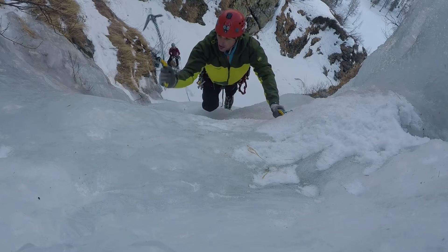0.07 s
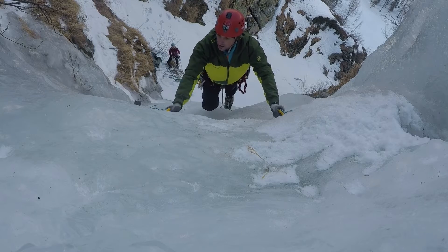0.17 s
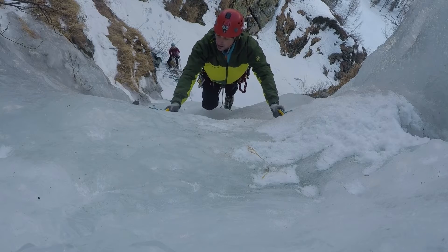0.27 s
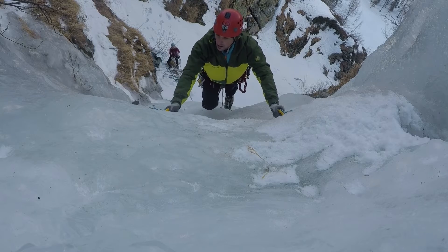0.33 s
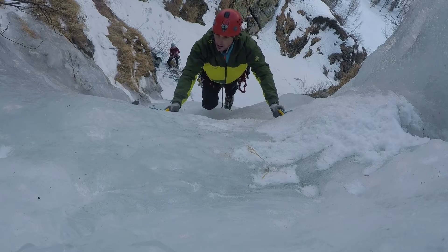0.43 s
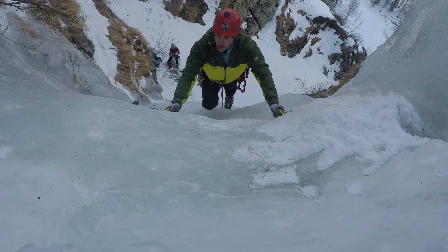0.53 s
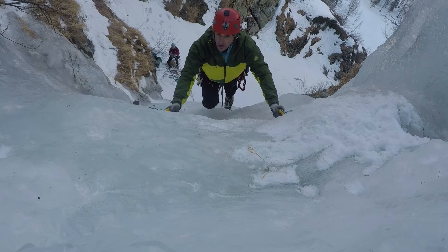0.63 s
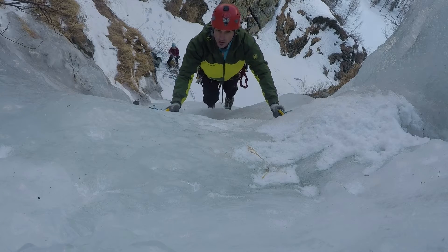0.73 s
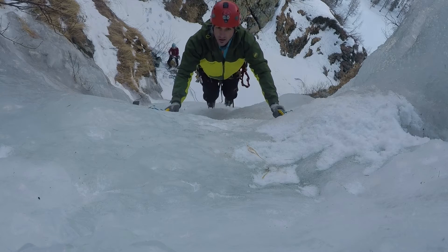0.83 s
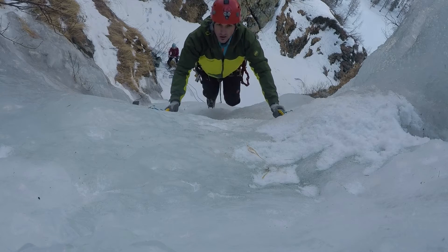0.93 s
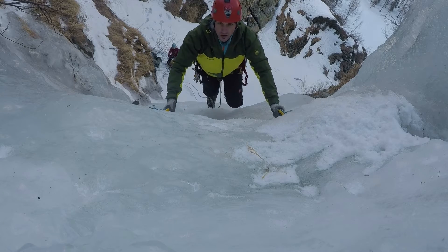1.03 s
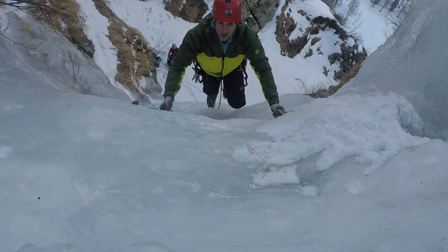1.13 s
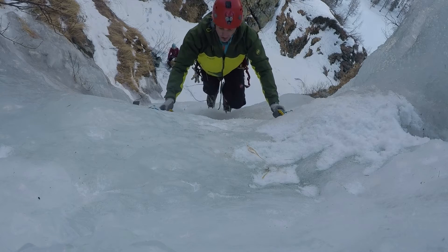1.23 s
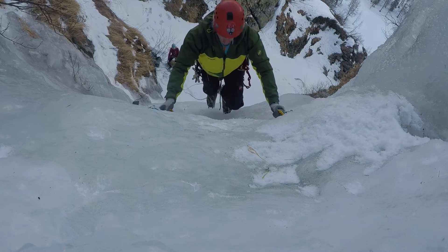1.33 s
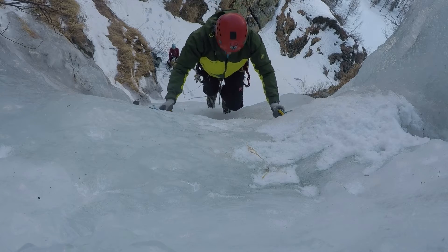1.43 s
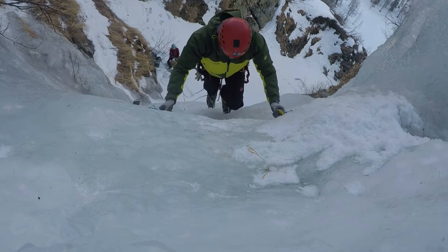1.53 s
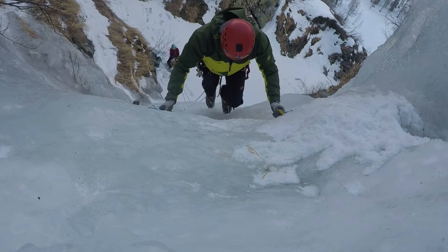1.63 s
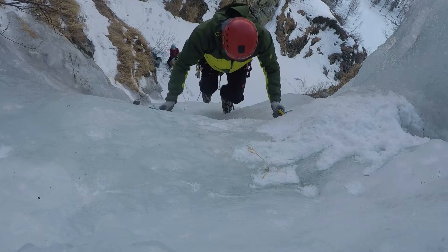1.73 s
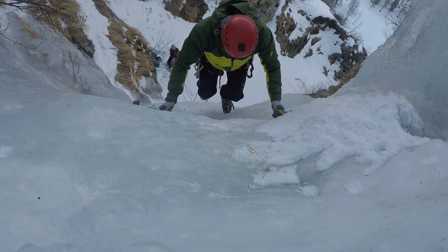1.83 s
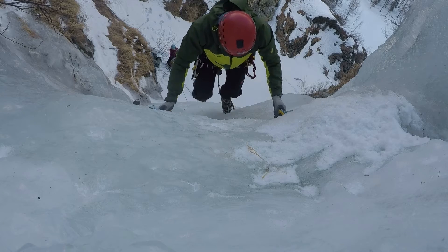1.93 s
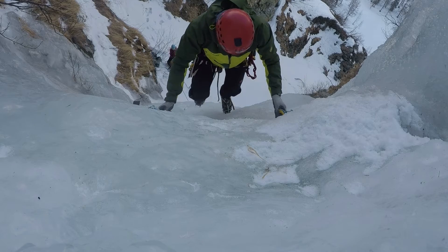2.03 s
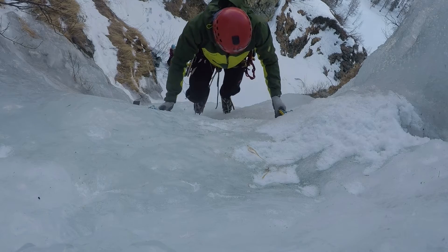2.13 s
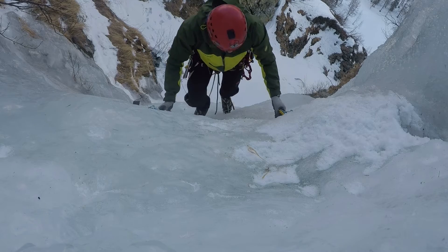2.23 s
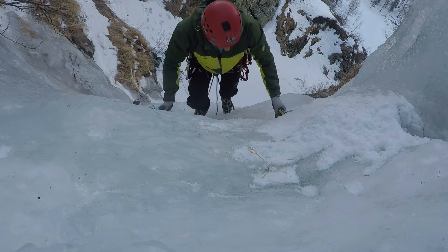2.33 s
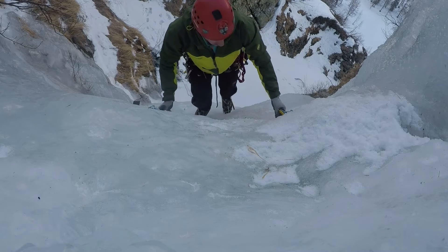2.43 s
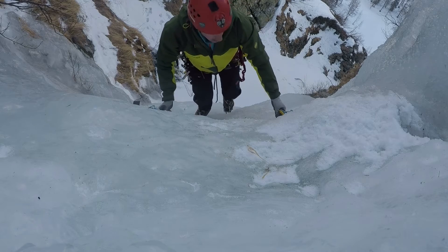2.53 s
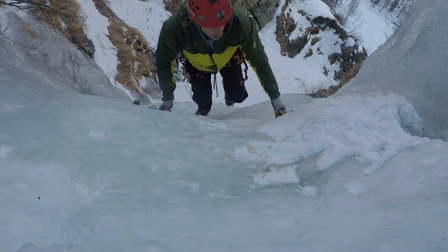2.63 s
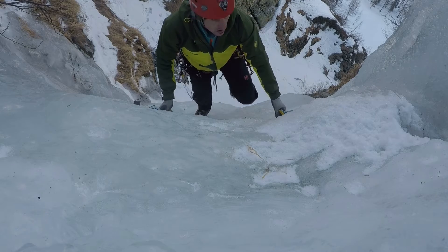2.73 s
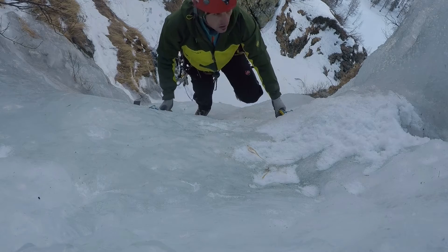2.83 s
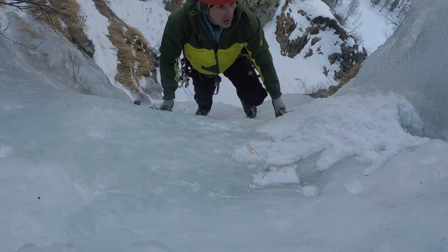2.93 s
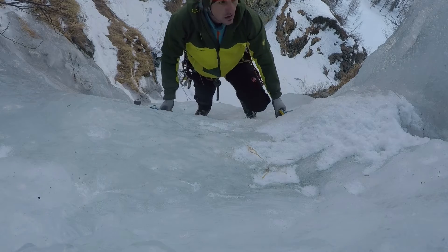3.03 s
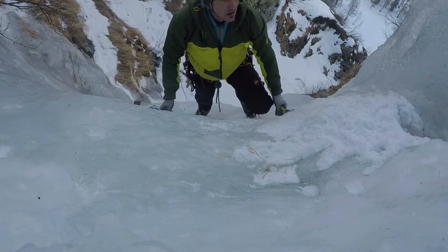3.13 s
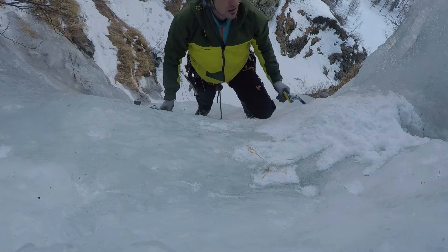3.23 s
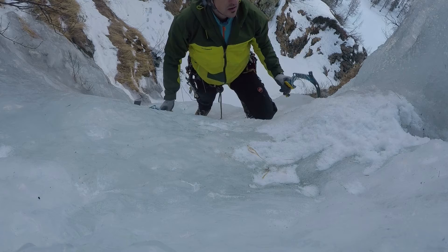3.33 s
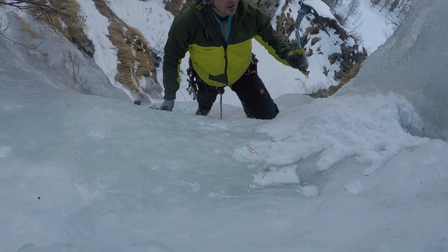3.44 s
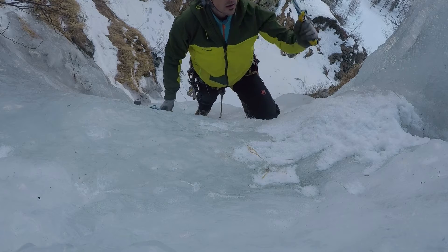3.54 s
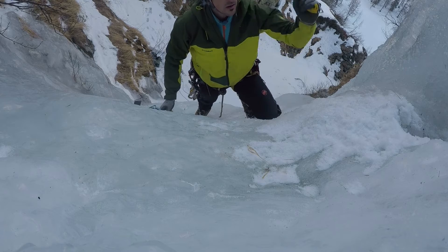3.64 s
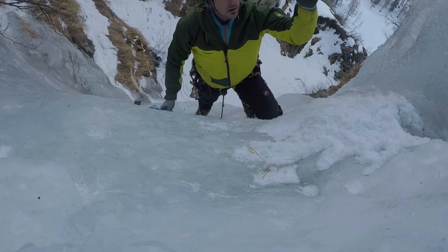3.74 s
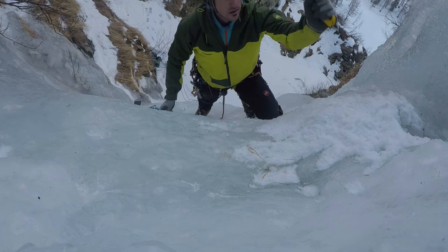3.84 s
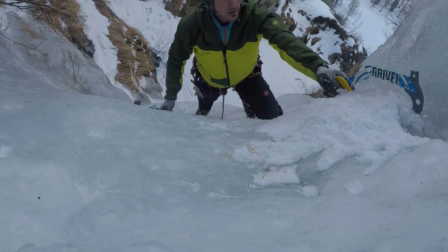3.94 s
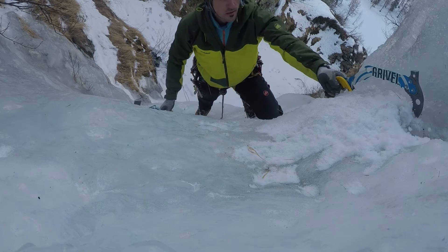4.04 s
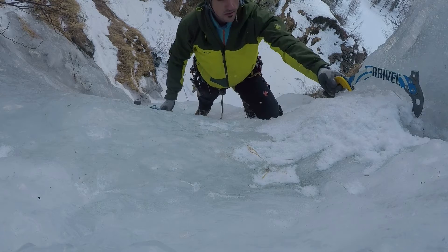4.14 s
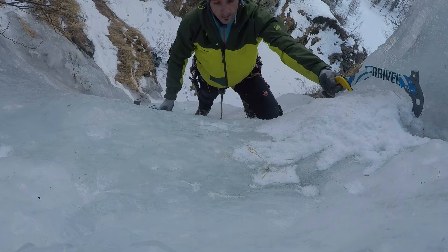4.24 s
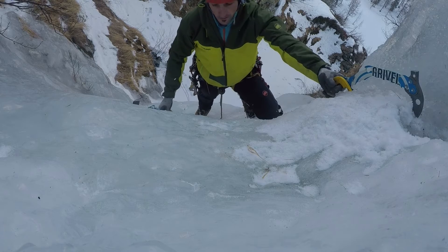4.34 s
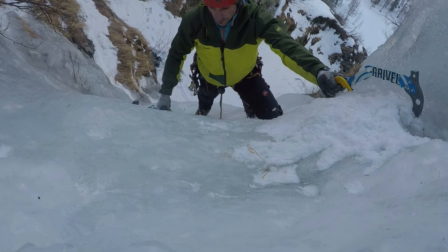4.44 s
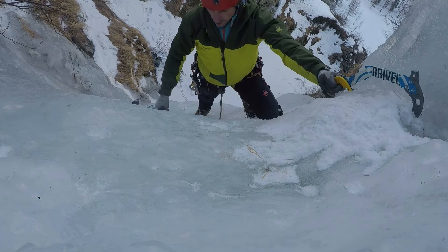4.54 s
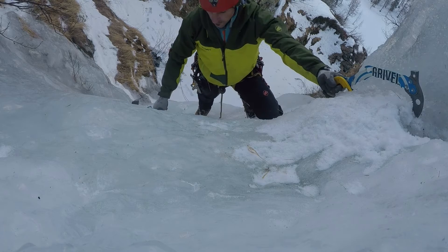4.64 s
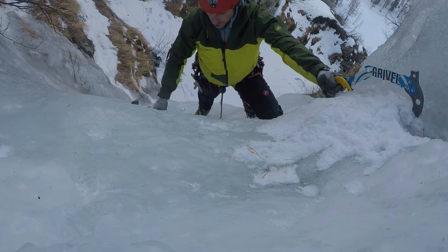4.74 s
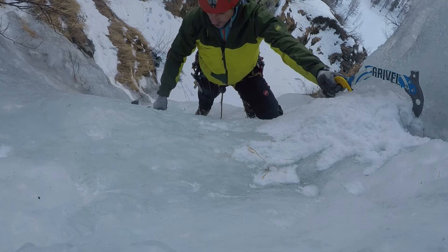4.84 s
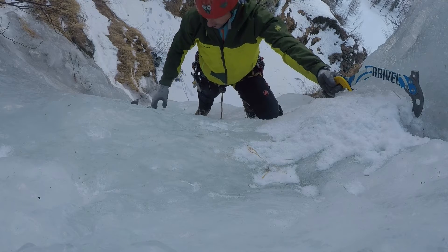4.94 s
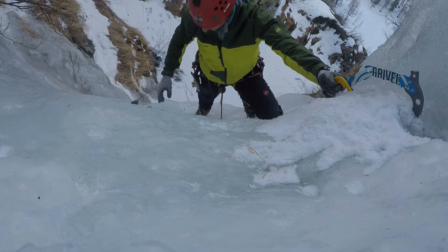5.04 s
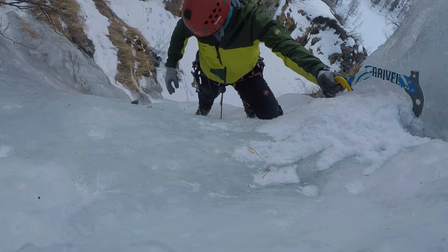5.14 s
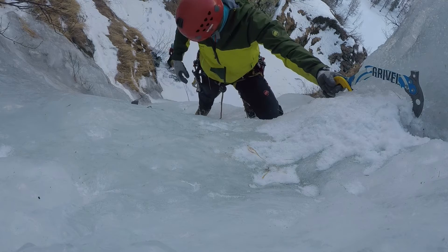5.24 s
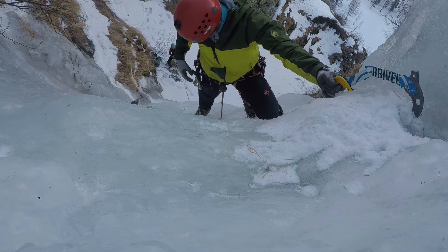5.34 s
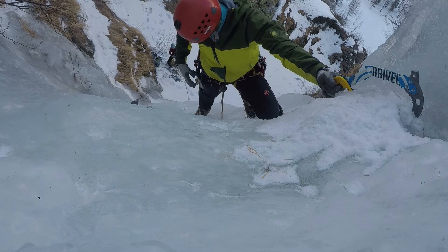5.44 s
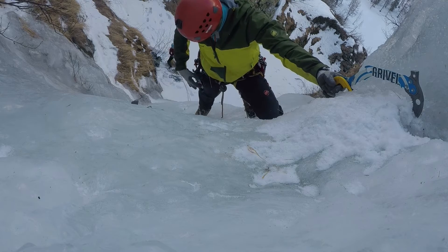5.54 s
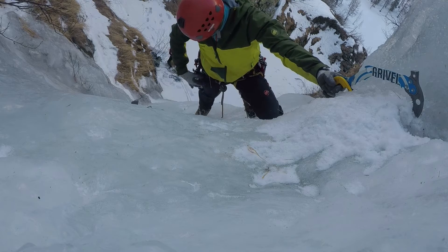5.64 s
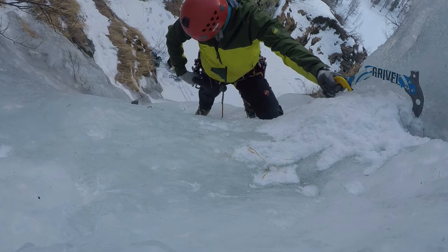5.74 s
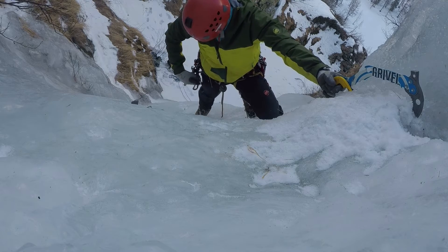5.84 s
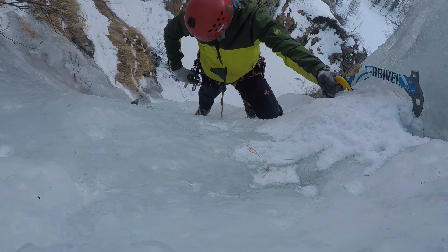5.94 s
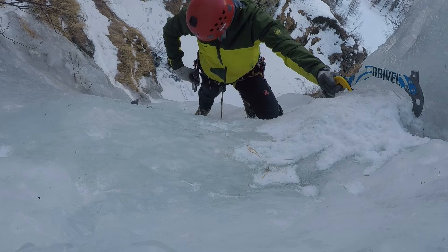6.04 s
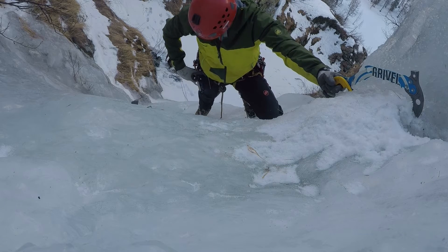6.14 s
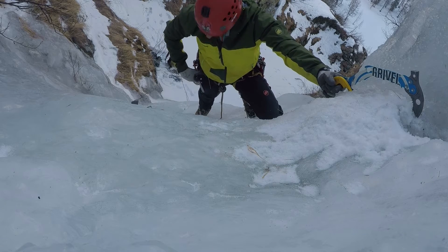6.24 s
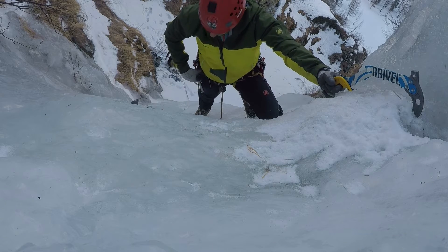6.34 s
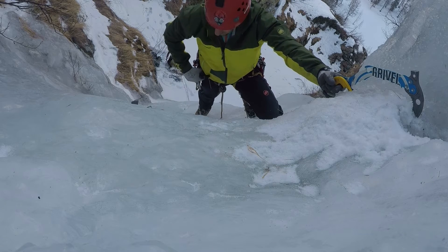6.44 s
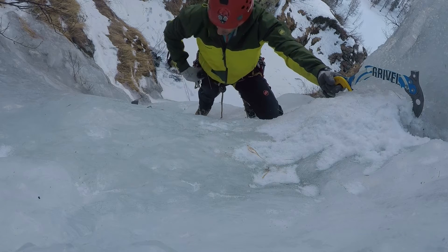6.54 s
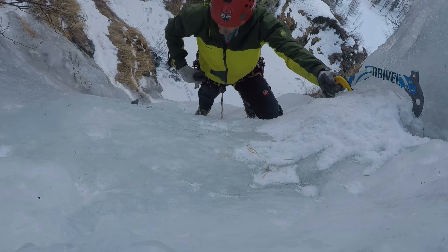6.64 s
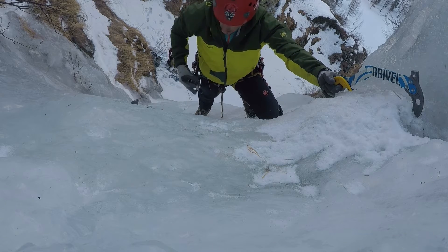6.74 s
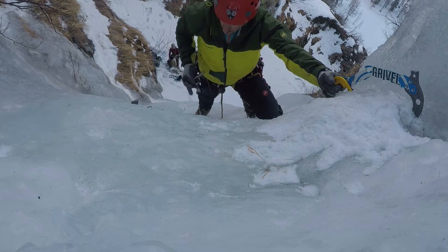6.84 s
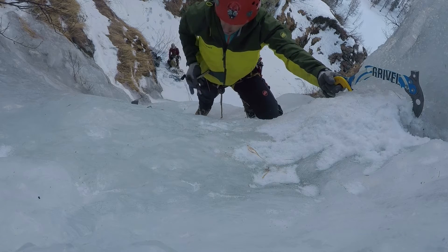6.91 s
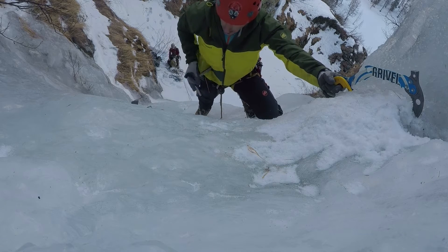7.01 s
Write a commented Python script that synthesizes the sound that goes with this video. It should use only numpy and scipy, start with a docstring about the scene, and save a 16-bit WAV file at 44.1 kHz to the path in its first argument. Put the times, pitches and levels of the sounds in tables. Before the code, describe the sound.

In a snowy ice gully, a microphone fixed just above the climber catches crunchy strikes into hollow ice, scattered chips, scraping points and bright pinging taps. Kicks come in irregular groups, building to one loud axe plant right beside the microphone, then quieter gear clinks and cloth movement. Distant air hisses softly throughout, nearly mono and without low rumble.

```python
"""A frozen waterfall in a gully: a climber works up the ice over a steady outdoor hiss.
Axe blows and boot kicks are jerky noise bursts with hollow resonances, a late thud and a spray of chips.
Taps and scrapes are coloured noise, the scrapes with tinkling crumbs; steel points and a carabiner
clink as decaying sines. Jacket rustle is swelling grainy noise; the walls echo the hits faintly."""
import sys
import numpy as np
from scipy import signal
from scipy.fft import rfft, irfft, next_fast_len
from scipy.io import wavfile

SR = 44100
rng = np.random.default_rng(int(sys.argv[2]) if len(sys.argv) > 2 else 0)


def wav_record(signal):
    """Record a signal, one row per channel, as 16-bit PCM in the file named by sys.argv[1]."""
    frames = np.transpose(np.atleast_2d(signal))
    bounded = np.clip(frames, -1, 1)
    # unit amplitude maps onto the largest positive 16-bit level
    quanta = np.round(bounded * 32767).astype(np.int16)
    wavfile.write(sys.argv[1], SR, quanta)


N = 311811
T = np.arange(N) / SR
SHORT = np.arange(SR // 3) / SR  # time axis of one event

# Distant rush and fine hiss. Each row: frequency in Hz, relative level in dB.
AIR_COLOUR = [(100, 2), (160, 3), (260, -1.5), (500, -7.5), (1000, -13), (2000, -17.5), (3200, -27.5),
              (4300, -25), (7500, -28.5), (9500, -24.5), (12000, -34.5), (15500, -42)]
# Rubbing cloth. Each row: frequency in Hz, relative level in dB.
RUB_COLOUR = [(500, 12), (1400, 11.5), (2800, 6), (4300, 6.5), (6300, 5), (8000, -5.5), (12000, -11),
              (16000, -22)]
# Climber's movements. Each row: peak time in seconds, length in seconds, relative level in dB.
MOVES = [(0.377, 0.52, -58), (0.88, 0.12, -54.5), (1.255, 0.68, -54.5), (1.987, 0.53, -55),
         (2.62, 0.42, -52), (3.002, 0.74, -52), (3.326, 0.11, -48), (3.645, 0.73, -54), (4.3, 0.43, -54.5),
         (5.105, 0.2, -63.5), (5.853, 0.27, -54.5), (6.26, 0.46, -54.5), (6.64, 0.22, -49.5),
         (7.03, 0.27, -58)]
# Scrapes and trickles of crumbs. Each row: middle in seconds, nominal length in seconds,
# relative level in dB, brightness centre in Hz.
SCRAPES = [(0.246, 0.01, -43.5, 3150), (0.33, 0.072, -58, 3720), (1.17, 0.07, -62, 5000),
           (2.638, 0.064, -55, 4600), (3.243, 0.055, -55, 4500), (3.352, 0.05, -57, 2340),
           (3.791, 0.018, -54.5, 2490), (4.221, 0.044, -52.5, 4400), (4.442, 0.037, -56, 4050),
           (5.895, 0.087, -60, 4500)]
# Modes of a crampon point. Each row: frequency in Hz, relative level in dB, free t60 in seconds.
POINT_MODES = [(1826, 3, 0.072), (3220, -13, 0.029), (3900, -15, .02), (4970, -13, 0.21), (5303, -24, 0.16),
               (6830, -16.5, 0.19), (8500, -41, 0.1), (9000, -17, 0.18)]
# Modes of a carabiner. Each row: frequency in Hz, relative level in dB, free t60 in seconds.
CARABINER_MODES = [(3220, 3, 0.1), (3070, -9, .05), (4226, -13, 0.078), (7700, -10, .1), (8570, -1.5, 0.15),
                   (8800, -15, .09), (12390, -16, .1), (14940, -17, .1)]
# Crampon clinks. Each row: start in seconds, level in dB, share of the free t60 left by the contact.
POINT_CLINKS = [(.463, -38, 0.2), (2.572, -28.5, 1), (2.883, -35, 0.39), (6.147, -39.5, .35)]
# Carabiner clinks. Each row: start in seconds, level in dB, share of the free t60 left by the contact.
CARABINER_CLINKS = [(5.893, -53, 0.45), (6.194, -42, 1), (6.205, -42, 0.68), (6.214, -41, 0.96)]
# Clear taps of steel and chips. Each row: time in seconds, tick level in dB, tick pitch in Hz,
# knock level in dB.
TAPS = [(0.4616, -8.5, 3470, -27), (0.578, -19, 5950, -28), (0.5871, -8, 4740, -15),
        (1.7426, -9, 4300, -12), (1.982, -12, 5000, -20), (2.0253, -16, 5660, -30),
        (2.1092, -16, 5200, -16), (2.182, -14, 5800, -26), (2.3996, -13, 3420, -27),
        (2.401, -9.5, 5600, -30), (2.5721, -6, 6360, -5), (2.6064, -12.5, 6350, -24),
        (2.728, -17, 4440, -30), (2.7896, -10.5, 7000, -16), (2.882, -4.5, 4950, -19),
        (3.315, -15, 5500, -18), (3.347, -10, 4500, -6), (3.3684, -15, 4600, -8), (3.6552, -18, 4900, -11),
        (3.782, -16.5, 3700, -12), (4.3445, -14, 5630, -28), (4.9414, -22, 3700, -16),
        (5.519, -17, 4300, -28), (5.783, -17, 6000, -34), (5.8027, -9, 5900, -6.5),
        (5.8744, -18, 5800, -23), (5.8951, -12, 3360, -34), (5.923, -11.5, 5340, -6),
        (6.033, -12.5, 5600, -20), (6.0763, -16.5, 5500, -20), (6.1472, -9, 5500, -18),
        (6.188, -11, 5700, -2), (6.196, -13, 5700, -28), (6.2164, -8, 5800, -21), (6.2841, -13, 3800, -23),
        (6.313, -15, 5200, -29), (6.4383, -17, 5200, -26), (6.548, -21, 6000, -25),
        (6.5837, -15, 6500, -29)]
# Dull part of a tap. Each row: frequency in Hz, relative level in dB.
KNOCK_COLOUR = [(400, -5), (1300, -0.5), (1800, -2.5), (2700, -13), (16000, -45)]
# Axe blows and kicks. Each row: time in seconds, crushing time in seconds, t60 in seconds,
# thud level in dB, crack level in dB, crack tilt in dB per octave.
BLOWS = [ (0.259, 0.0086, 0.089, 14, 6.5, -3.5), (1.3757, 0.011, 0.025, 8, -3.5, -3),
         (2.3322, 0.01, 0.028, 15, -5.5, -5.5), (2.3946, 0.0024, 0.043, 12.5, -16.5, -8.5),
         (2.56, 0.0027, 0.02, 5, -21.5, -11.5), (3.04, 0.0089, 0.076, 16, -1, -3.5),
         (3.096, 0.0082, 0.053, 2, -29, -12.5), (4.0231, 0.012, 0.05, 20, 9, -0.5),
         (6.64, 0.0036, 0.051, 4, -2.5, 2), (7.025, 0.032, 0.028, 0, -24.5, -11.5)]
# Hollow notes of the ice round a blow. Each row: time of the blow in seconds, frequency in Hz,
# width in Hz, relative level in dB.
HOLLOWS = [ (.2595, 840, 220, 10), (.2595, 1800, 250, 10), (.2595, 2750, 250, 7), (.2595, 3770, 250, 14.5),
           (1.3755, 546, 170, 9), (1.3755, 1370, 260, 9), (1.3755, 1740, 200, 4), (2.3315, 350, 90, 13),
           (2.3315, 745, 90, 10.5), (2.3315, 1730, 120, 4), (3.041, 584, 120, 8), (3.041, 1880, 400, 2.5),
           (4.022, 155, 70, 19.5), (4.022, 420, 160, 11), (4.022, 960, 100, 13), (4.022, 1160, 180, 18),
           (4.022, 1700, 280, 20.5), (4.022, 3120, 250, 11), (4.022, 4600, 400, 12),
           (4.022, 5530, 450, 13.5), (4.022, 7800, 494, 9), (6.639, 610, 109, 14.5), (6.639, 1320, 130, 7),
           (6.639, 6040, 400, 15.5), (6.639, 9100, 494, 7)]
# Fixed top shape given to every blow: a deep dip near 11 kHz and a rise near 13 kHz. Each row: frequency in Hz,
# level in dB relative to that at CRACK_HIGH_HZ.
CRACK_TOP = [(8700, -7.5), (10800, -27), (12800, -13.5), (15000, -26), (16000, -41)]

LEAD_S = 0.02  # lead kept before each hit for its fade-in
THUD_HZ, CRACK_LOW_HZ, CRACK_MID_HZ, CRACK_HIGH_HZ = 175, 570, 2880, 7000  # tilt pivots on the middle
BLOW_RISE_T60_S = 0.026  # noise before the hit swells at 60 dB per this time
TAP_RISE_T60_S, TAP_HOLD_S, TAP_T60_S = 0.011, 0.001, 0.056
TICK_RISE_DB_PER_OCT, TICK_FALL_DB_PER_OCT = 7.5, 17.5  # below and above the pitch
STRAY_PER_S, STRAY_HZ = 7, 5060
STRAY_TICK_DB, STRAY_KNOCK_DB = 32, 31.5  # relative to effort()
CLOSE_BLOW_S = 4.03  # axe planted beside the microphone: slightly wide
SHEEN_HZ = 11700
LOW_CUT_HZ, TOP_HZ = 136.8, 15400


def undb(db):
    """Amplitude of a level in dB."""
    return 10 ** (np.asarray(db) / 20)


def unit(x):
    """Scale to unit energy."""
    return x / np.sqrt(np.sum(x ** 2))


def fade(t, t60_s):
    """Exponential decay from t = 0, at 60 dB per t60."""
    return np.exp(-np.log(1000) * np.maximum(t, 0) / t60_s)


def add(track, start_s, x):
    """Mix x into the track."""
    i = int(start_s * SR)
    track[i:i + len(x)] += x[:max(N - i, 0)]


def colour(x, points):
    """Causal minimum-phase filter through (Hz, dB) points, by folding the cepstrum."""
    size = 2 * next_fast_len(len(x))
    hz, db = np.transpose(points)
    freqs_hz = np.maximum(np.fft.rfftfreq(size, 1 / SR), 1)
    response_db = np.interp(np.log(freqs_hz), np.log(hz), db)
    cepstrum = irfft(np.log(undb(response_db)))
    cepstrum[1:size // 2] *= 2
    cepstrum[size // 2 + 1:] = 0
    response = np.exp(rfft(cepstrum))
    return irfft(rfft(x, size) * response)[:len(x)]


def zero_phase(x, kind, hz, order):
    """Low- or high-pass without delay, run forwards and backwards."""
    sos = signal.butter(N=order, Wn=hz, btype=kind, fs=SR, output="sos")
    return signal.sosfiltfilt(sos, x)


def walk(rate_hz):
    """Random values joined by lines, spread near 1."""
    knots = rng.standard_normal(int(N / SR * rate_hz) + 2)
    return np.interp(T * rate_hz, np.arange(len(knots)), knots)


def cracks(t, spread_db):
    """Dense micro-fractures: many small, a few large."""
    size = np.minimum(rng.exponential(size=len(t)), 5)
    return rng.standard_normal(len(t)) * undb(spread_db * size)


def crush(hold_s, t60_s, rise_t60_s):
    """After a fade-in, steel breaks the crust at LEAD_S and sinks in by jerks, then the ice settles."""
    t = SHORT - LEAD_S
    jerks_db = np.interp(SHORT, np.arange(400) / 1000, 3.8 * rng.standard_normal(400))
    envelope = undb(jerks_db) * fade(-t, rise_t60_s) * fade(t - hold_s, t60_s)
    return unit(cracks(SHORT, 1.16) * envelope)


def crumbs(times_s, centre_hz, size_db=4, cycles=14, octaves=0.58):
    """Each ice crumb tinkles for a few cycles at a random pitch; the sum has unit energy."""
    out = np.zeros(N)
    t = SHORT[:SR // 100]
    for s in times_s:
        hz = centre_hz * 2 ** (octaves * rng.standard_normal())
        hz = np.clip(hz, centre_hz / 4, 9500)
        strength = undb(size_db * min(rng.exponential(), 3))
        envelope = fade(t, cycles / hz) * (1 - np.exp(-hz * t))
        add(out, max(s, 0), strength * np.sin(2 * np.pi * hz * t) * envelope)
    return unit(out[:len(SHORT)])


def air(level_db=-48.5, sway_db=1.0):
    """Distant rush of the valley with a fine hiss: coloured noise that sways slightly in level."""
    noise = unit(colour(rng.standard_normal(N), AIR_COLOUR)) * np.sqrt(N)
    return noise * undb(level_db + sway_db * walk(2.87))


def effort():
    """Strength of the rubbing: bell-shaped swells, summed in power."""
    power = 0
    for s, length_s, db in MOVES:
        swell = undb(db) * np.exp(-(2 * (T - s) / length_s) ** 2)
        power = power + swell ** 2
    return np.sqrt(power)


def rustle(gain_db=-2, flicker_db=2, grain_db=4.0):
    """Stiff cloth and loose crumbs rub as the climber shifts: grainy noise shaped by effort."""
    grains = unit(colour(cracks(T, grain_db), RUB_COLOUR)) * np.sqrt(N)
    return grains * effort() * undb(gain_db + flicker_db * walk(70))


def scrapes(crumbs_per_s=600, grit_db=-4, gain_db=-2):
    """Dragged steel grinds the surface and plucks off a stream of crumbs."""
    out = np.zeros(N)
    for s, length_s, db, hz in SCRAPES:
        swell = np.exp(-2 * ((SHORT - LEAD_S - length_s) / length_s) ** 2)
        shape = [(hz / 6, -14), (hz * 0.82, -2), (hz, 0), (hz * 2, -6), (11000, -20), (16000, -26)]
        grit = unit(colour(cracks(SHORT, 2.5) * swell, shape))
        count = int(crumbs_per_s * length_s) + 2
        loose = crumbs(LEAD_S + length_s * rng.triangular(0, 1, 2, size=count), hz)
        scrape = (undb(grit_db) * grit + loose) * np.sqrt(length_s * SR)
        add(out, s - LEAD_S - length_s, scrape * undb(db + gain_db))
    return out


def clinks(table, modes):
    """Struck steel rings in its slightly detuned modes; contact shortens the ring."""
    out = np.zeros(N)
    for s, db, free_share in table:
        ring = np.zeros(len(SHORT))
        for hz, level_db, t60_s in modes:
            detuned_hz = hz * (1 + 0.0045 * rng.standard_normal())
            decay = undb(level_db) * fade(SHORT, t60_s * free_share)
            ring += decay * np.sin(2 * np.pi * detuned_hz * SHORT)
        add(out, s, undb(db) * ring)
    return out


def tap(tick_db, hz, knock_db, uneven_db=6, ping_db=5, ping_octaves=0.074):
    """Light contact: bright pinging tick over a duller knock, with random resonances each time."""
    grid_hz = np.geomspace(400, 16000, num=72)
    octaves = np.log2(grid_hz / hz)
    ping = ping_db * np.exp(-(octaves / ping_octaves) ** 2)
    slopes = np.minimum(TICK_RISE_DB_PER_OCT * octaves, -TICK_FALL_DB_PER_OCT * octaves)
    tick = undb(tick_db + ping + slopes)
    knock_hz, knock_shape_db = np.transpose(KNOCK_COLOUR)
    knock = undb(knock_db + np.interp(np.log(grid_hz), np.log(knock_hz), knock_shape_db))
    uneven = uneven_db * (2 * rng.random(len(grid_hz)) - 1)
    shape_db = 20 * np.log10(np.hypot(tick, knock)) + uneven
    return colour(crush(TAP_HOLD_S, TAP_T60_S, TAP_RISE_T60_S), list(zip(grid_hz, shape_db)))


def taps():
    """Clear taps of steel and chips, and chance stray ticks whose strength follows effort."""
    out, moving = np.zeros(N), effort()
    for s, tick_db, hz, knock_db in TAPS:
        add(out, s - LEAD_S, tap(tick_db, hz, knock_db))
    for when, pitch in rng.random((int(STRAY_PER_S * N / SR), 2)):
        stray = tap(STRAY_TICK_DB, STRAY_HZ * 2 ** (pitch - 0.5), STRAY_KNOCK_DB)
        add(out, when * N / SR, moving[int(when * N)] * stray)
    return out


def hollows(blow_s, hold_s, t60_s):
    """Hollow ice round one blow resonates: crushing noise through narrow peaks."""
    out = np.zeros(len(SHORT))
    for s, hz, width_hz, db in HOLLOWS:
        if abs(s - blow_s) < 0.02:
            note = crush(hold_s, t60_s, BLOW_RISE_T60_S)
            for q in (hz / width_hz, 2):
                note = signal.lfilter(*signal.iirpeak(hz, q, fs=SR), note)
            out += unit(note) * undb(db) * np.sqrt(np.pi * width_hz / SR)
    return out


def blows(spray_db=-19, spray_t60_s=0.093, thud_lag_s=0.00193, tinkle_db=-23):
    """Each blow crushes the ice, rings its hollows and sends out a spray of chips."""
    out = np.zeros(N)
    for s, hold_s, t60_s, thud_db, crack_db, tilt in BLOWS:
        low_db, high_db = (crack_db + tilt * np.log2(hz / CRACK_MID_HZ)
                           for hz in (CRACK_LOW_HZ, CRACK_HIGH_HZ))
        body = [(THUD_HZ, thud_db), (CRACK_LOW_HZ, low_db), (CRACK_HIGH_HZ, high_db)]
        body += [(hz, high_db + db) for hz, db in CRACK_TOP]
        crack = colour(crush(hold_s, t60_s, BLOW_RISE_T60_S), body)
        # the mass of ice answers a little after the crack
        thud = zero_phase(crack, "low", 745, order=2)
        crack = crack - thud + hollows(s, hold_s, t60_s)
        spray = colour(unit(cracks(SHORT, 1.9) * fade(SHORT, spray_t60_s)), body)
        spray = colour(spray, [(300, -15), (2000, 8), (4200, 16), (6300, 17), (8500, -10)])
        # chips land just afterwards, louder after a harder crack
        chips = crumbs(rng.exponential(0.017, size=30), 4400) * np.sqrt(np.sum(crack ** 2))
        add(out, s - LEAD_S, crack)
        add(out, s - LEAD_S + thud_lag_s, thud)
        add(out, s + hold_s, undb(spray_db) * spray + undb(tinkle_db) * chips)
    return out


def gully(x, echo_db=-23, t60_s=0.53):
    """Rock and ice walls scatter back a thin tail: convolution with fading coloured noise."""
    t = T[:SR]
    tail = unit(rng.standard_normal(SR) * fade(t, t60_s) * (1 - np.exp(-t / 0.0085)))
    tail = colour(tail, [(200, 12.5), (1500, -13.5), (4300, 3), (9000, -0.5)])
    return x + undb(echo_db) * signal.fftconvolve(x, tail)[:N]


def scene(lean_db=-11, width_db=-23, sheen_db=-71, scatter_t60_s=0.015):
    """Climber straight ahead; the top of the hits leans right and the finest hiss is wide."""
    steel = clinks(POINT_CLINKS, POINT_MODES) + clinks(CARABINER_CLINKS, CARABINER_MODES)
    hits = blows() + taps() + steel
    mid = air() + rustle() + scrapes() + gully(hits)
    close = zero_phase(hits, "high", 1000, order=4) * (abs(T - CLOSE_BLOW_S) < 0.05)
    scatter = unit(rng.standard_normal(len(SHORT)) * fade(SHORT, scatter_t60_s))
    top = undb(lean_db) * hits + undb(sheen_db) * rng.standard_normal(N)
    top = zero_phase(top, "high", SHEEN_HZ, order=12)
    side = top + undb(width_db) * signal.fftconvolve(close, scatter)[:N]
    return np.array([mid - side, mid + side])


def record(dry, leak_db=-33):
    """A steep wind filter lets only a trace of the bass through; the top is cut."""
    cut = zero_phase(dry, "high", LOW_CUT_HZ, order=12)
    top_cut = signal.ellip(8, 0.2, 70, TOP_HZ, fs=SR, output="sos")
    return signal.sosfilt(top_cut, cut + undb(leak_db) * dry)


dry = scene()
out = record(dry)
wav_record(out)
```